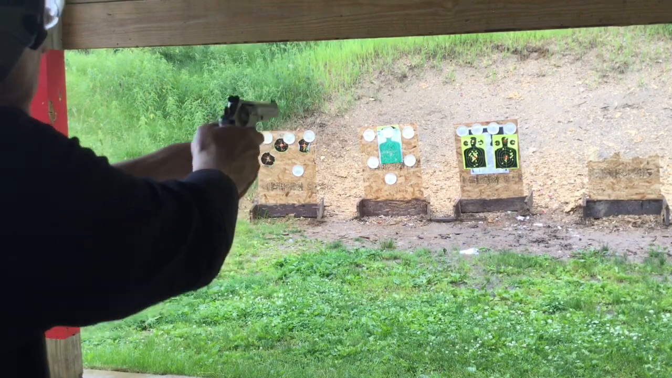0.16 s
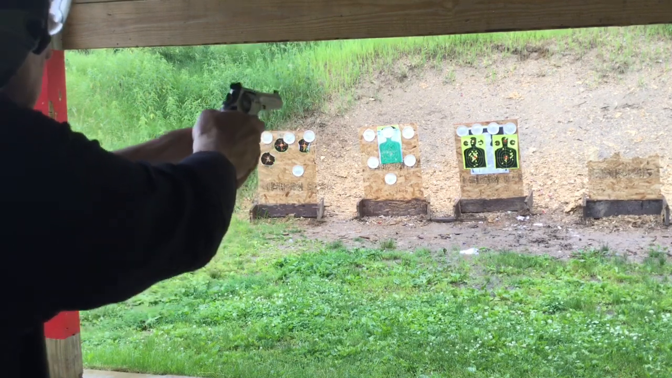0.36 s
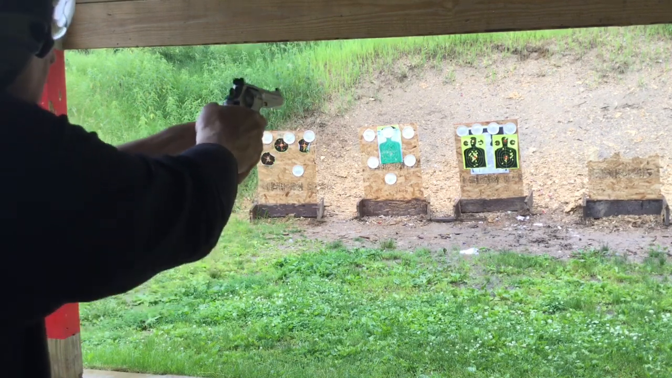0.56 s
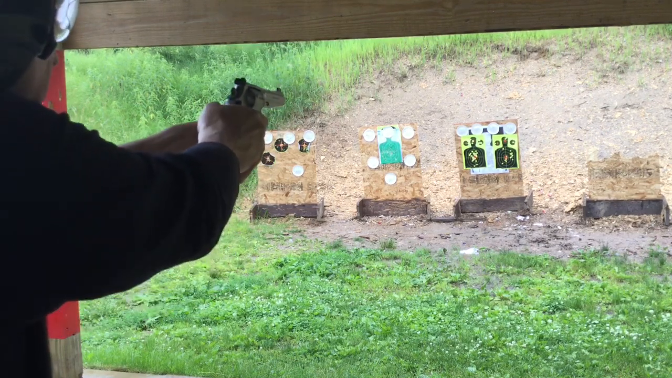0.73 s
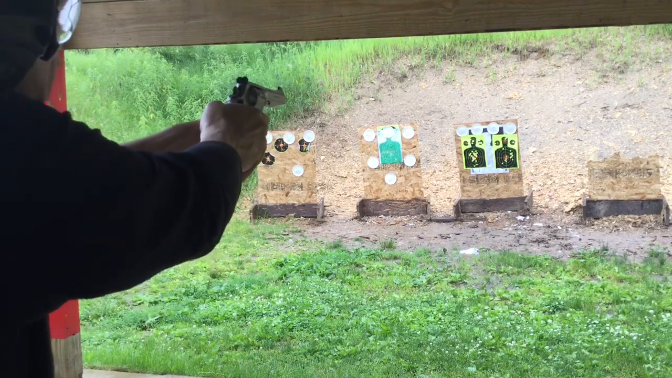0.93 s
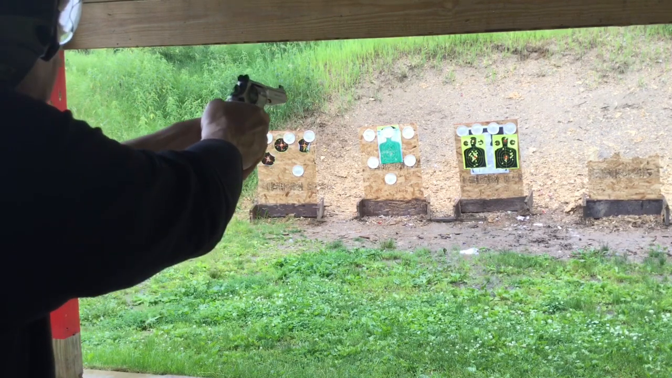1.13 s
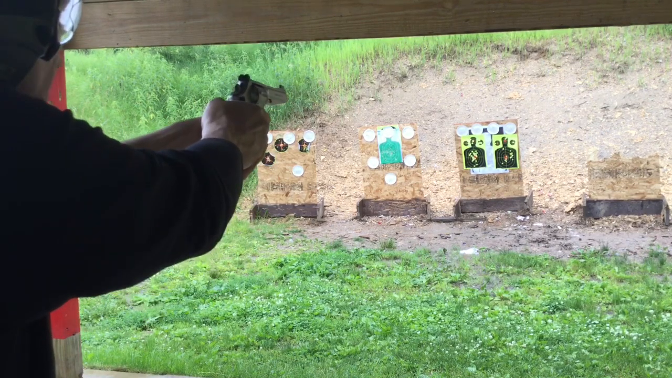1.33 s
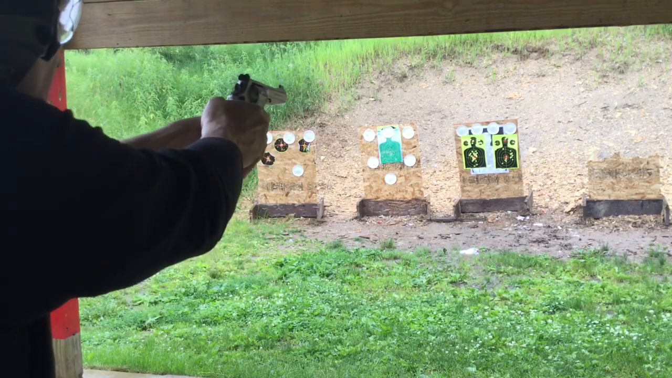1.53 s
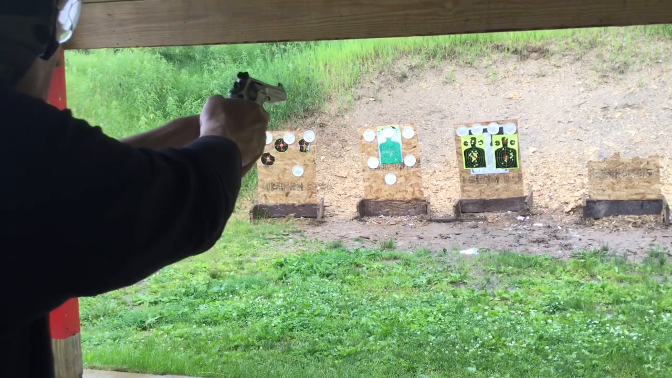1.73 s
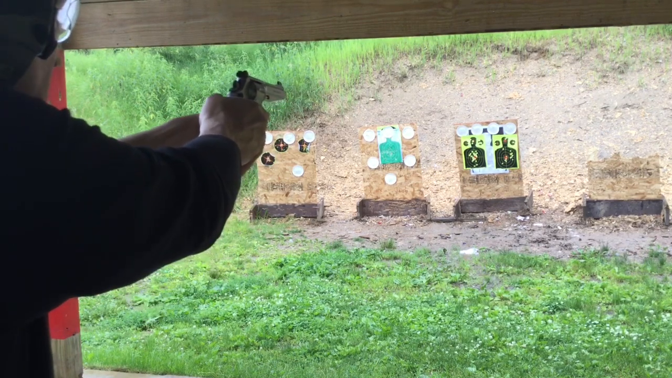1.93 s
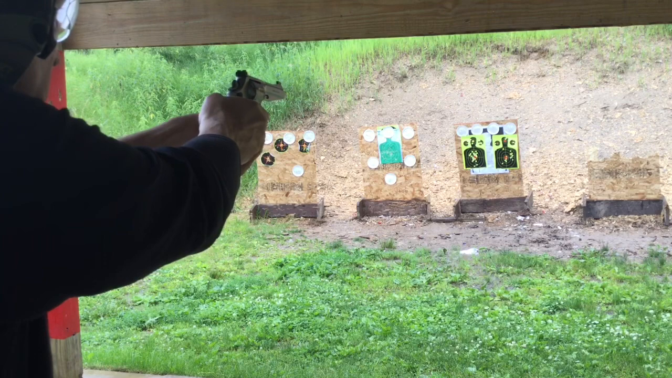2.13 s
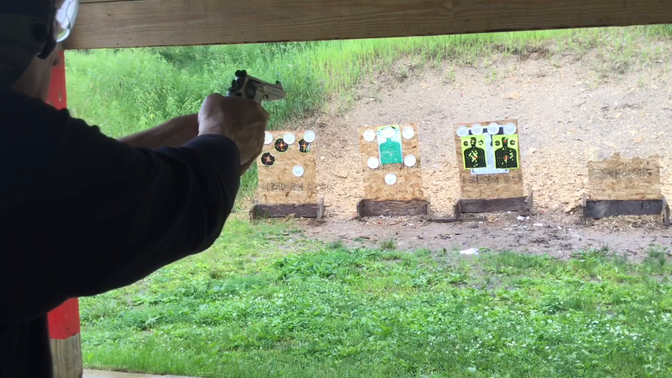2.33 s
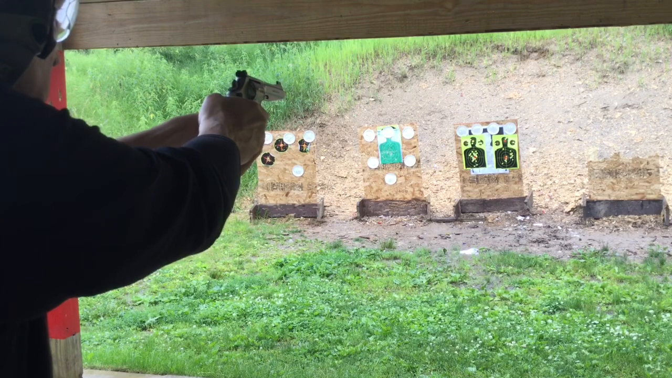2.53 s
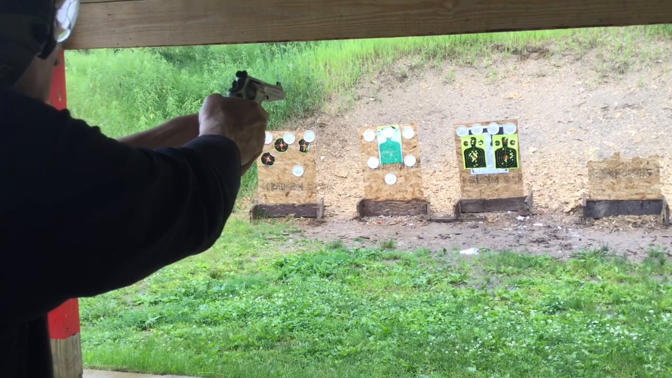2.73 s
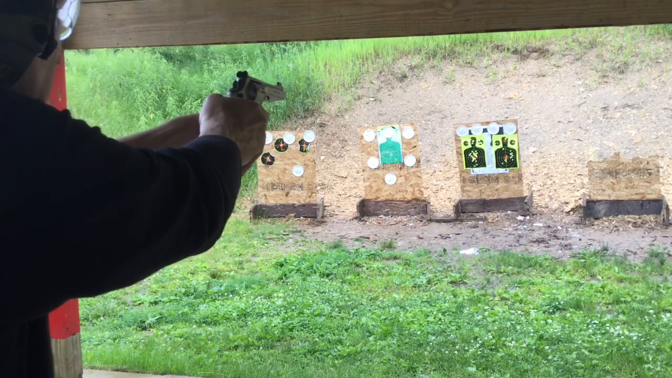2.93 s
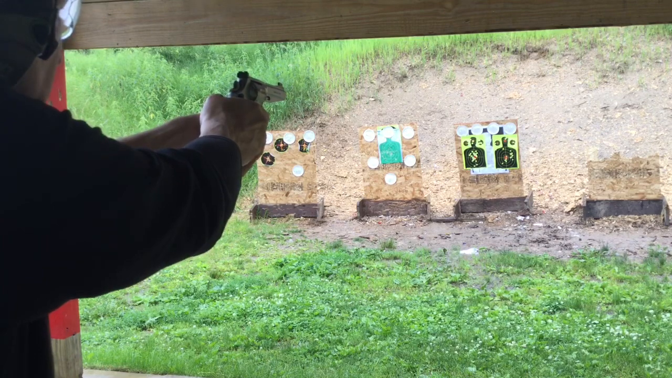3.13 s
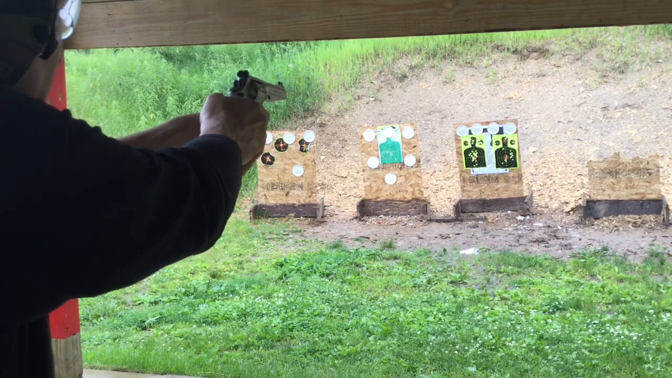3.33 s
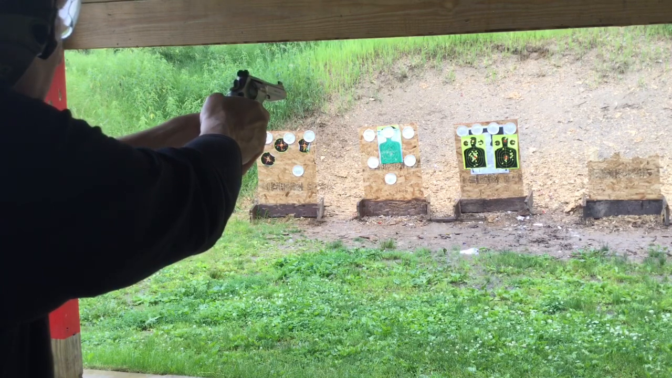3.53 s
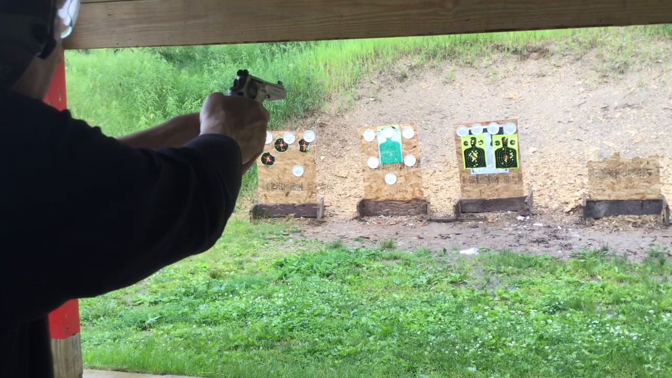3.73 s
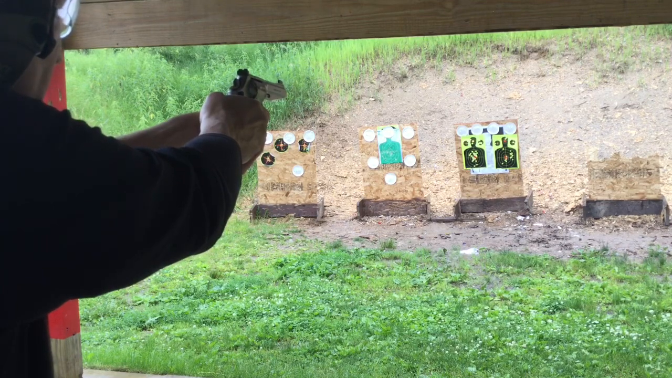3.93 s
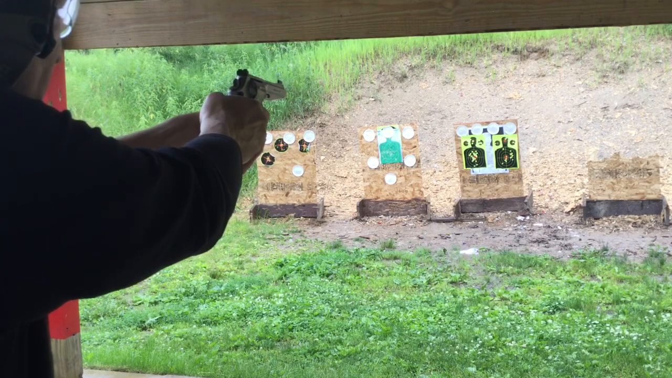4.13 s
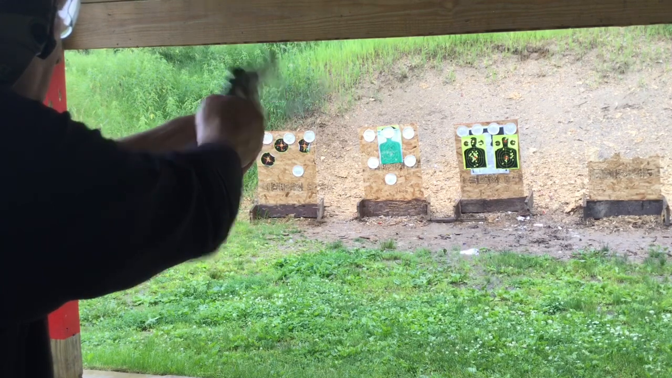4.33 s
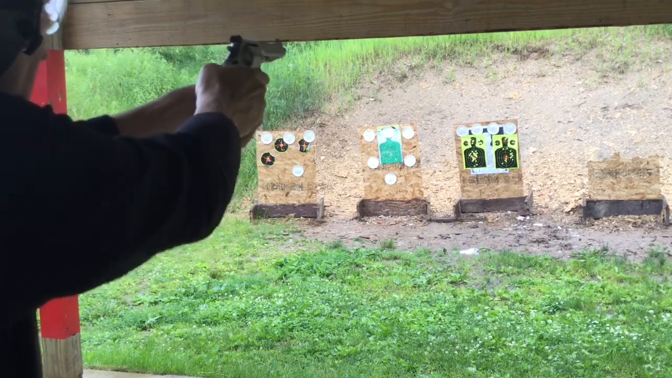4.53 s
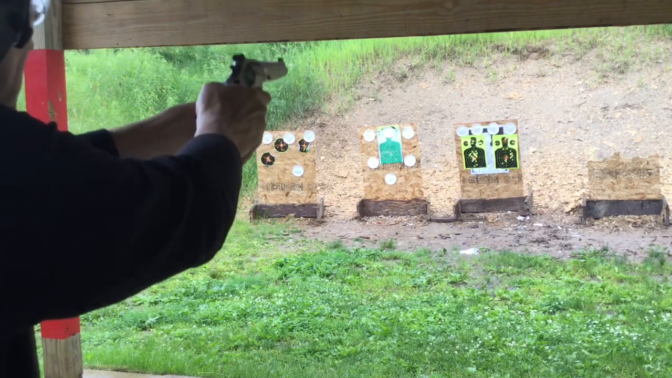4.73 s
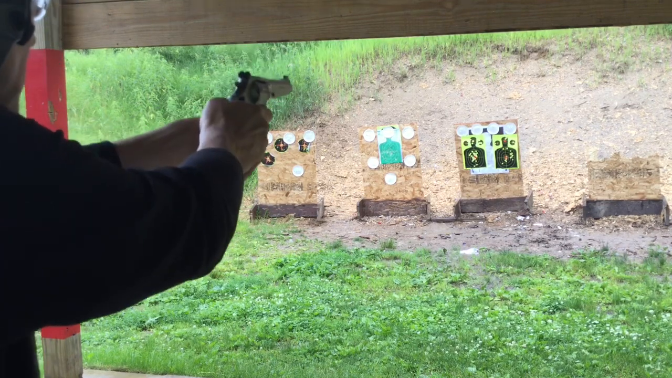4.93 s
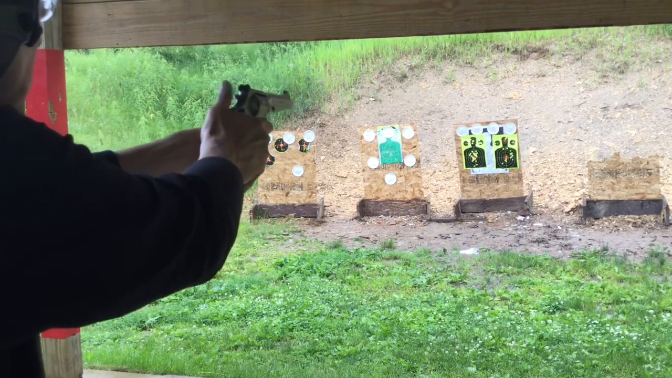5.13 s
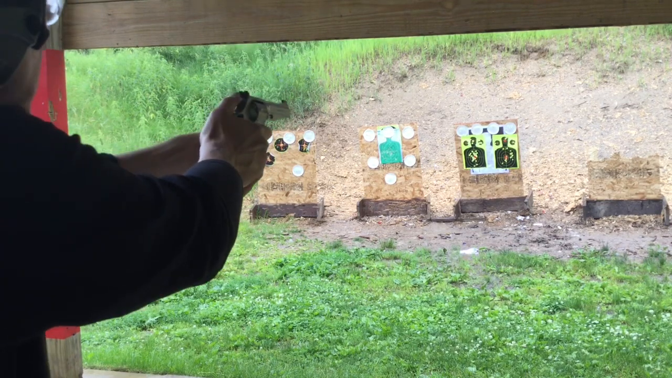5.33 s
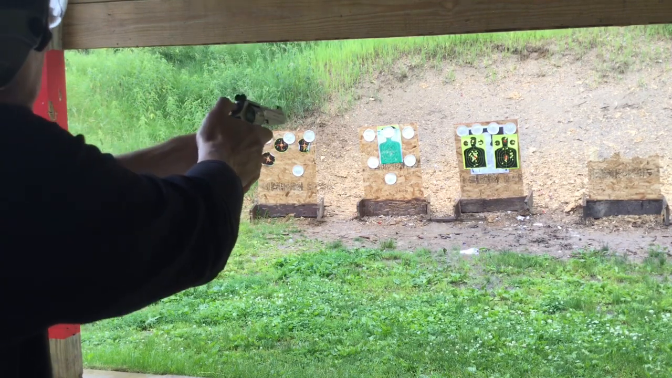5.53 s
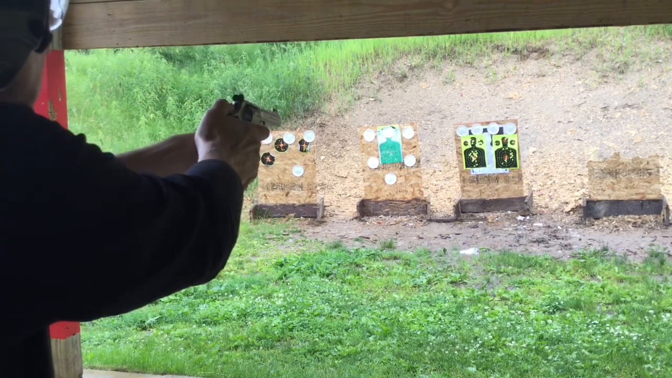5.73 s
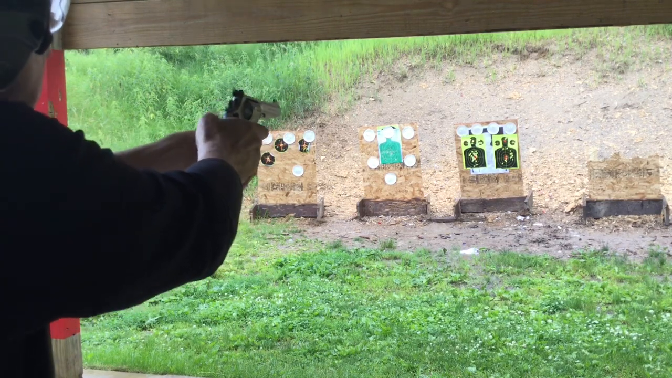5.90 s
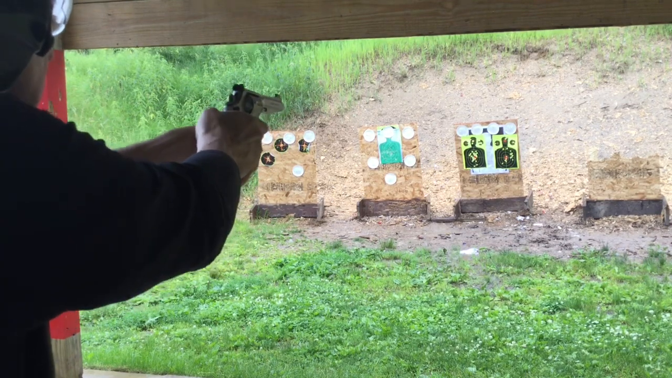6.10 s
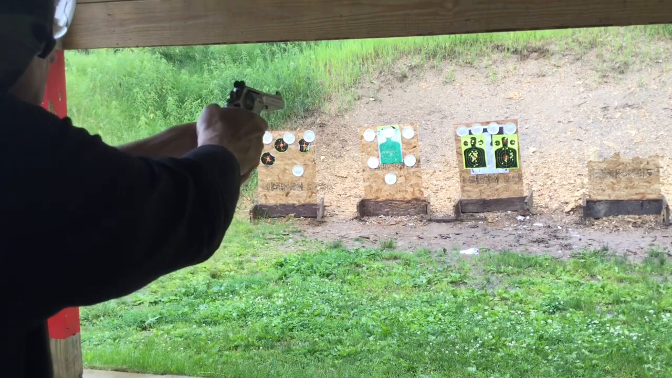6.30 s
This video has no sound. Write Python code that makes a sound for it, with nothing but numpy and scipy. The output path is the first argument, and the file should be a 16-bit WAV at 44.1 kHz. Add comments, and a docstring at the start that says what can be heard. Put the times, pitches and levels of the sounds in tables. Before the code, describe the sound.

Faint metallic clicks and a distant bird over a soft outdoor hush, then one overloaded revolver blast booms and rolls away before more gun clicks.

```python
"""Under the wooden roof of an outdoor range, one revolver shot overloads the microphone.
The blast is noise that dies band by band; the roof booms in a few tones, the earth bank slaps back,
and noise that grows ever duller makes the report roll away over the hills. A thin high ring follows.
The gun's action clicks before and after as short snaps of ringing steel; a small bird sings far off
in gliding tones, over a soft outdoor hush of coloured noise with a faint rustle and crackle."""
import sys
import numpy as np
from scipy import signal
from scipy.fft import rfft, irfft, next_fast_len
from scipy.io import wavfile
from scipy.ndimage import map_coordinates

SR = 44100
rng = np.random.default_rng(int(sys.argv[2]) if len(sys.argv) > 2 else 0)


def log_audio(samples):
    """Write samples as a 16-bit WAV file to the path given in sys.argv[1]."""
    # one column per channel
    frames = np.atleast_2d(samples).T
    # limit to full scale, then quantise
    limited = np.clip(frames, -1, 1)
    pcm = np.round(limited * 32767).astype(np.int16)
    wavfile.write(sys.argv[1], SR, pcm)


N = 280476  # length of the scene in samples

SHOT_S = 4.1765  # moment of the muzzle blast (s)

# how long sound lingers under the shelter: f/Hz, time to fall by 60 dB/s
SHELTER = [(300, .25), (4000, 0.23), (14000, 0.092)]


def amp(db):
    """Turn decibels into a plain gain."""
    return 10 ** (np.asarray(db) / 20)


def unit(x):
    """Scale a sound to an average (rms) strength of 1."""
    return x / np.sqrt(np.mean(x ** 2) + 1e-20)


def clock():
    """The time of every sample in seconds."""
    return np.arange(N) / SR


def along(points, hz):
    """Read a curve of (Hz, value) points, with straight lines between them on a log frequency axis."""
    f, v = np.transpose(points)
    return np.interp(np.log(hz + 1), np.log(f + 1), v)


def filtered(x, response):
    """Multiply the spectrum of a sound by a gain that depends on frequency."""
    size = next_fast_len(N + SR // 2)  # spare room so that the end does not wrap to the start
    gain = response(np.fft.rfftfreq(size, 1 / SR))
    return irfft(rfft(x, size) * gain, size)[:N]


def noise(spectrum):
    """Noise of rms 1 whose tone colour follows (Hz, dB) points."""
    return unit(filtered(rng.standard_normal(N), lambda hz: amp(along(spectrum, hz))))


def resonant(modes):
    """Noise of rms 1 gathered around resonances, given as (Hz, width Hz, dB)."""
    def peaks(hz):
        gain = 0
        for center, width, db in modes:
            damping = (hz * width) ** 2
            gain = gain + amp(db) * damping / ((center * center - hz * hz) ** 2 + damping)
        return gain
    return unit(filtered(rng.standard_normal(N), peaks))


def wobble(rate):
    """A smooth random curve through `rate` random points a second."""
    knots = rng.standard_normal(int(N * rate / SR) + 4)
    fine = np.arange(8 * (len(knots) - 1)) / 8  # eight curve points per knot
    curve = map_coordinates(knots, [fine])
    return np.interp(clock() * rate, fine, curve)


def fading(x, start, loss):
    """From the start time on, each frequency loses its own number of dB a second."""
    hz, t, z = signal.stft(x, SR, nperseg=256)
    loss_db_per_s = np.maximum(loss(hz), -10)[:, None]
    gain = amp(-np.maximum(t - start, 0) * loss_db_per_s)
    return signal.istft(z * gain, SR, nperseg=256)[1][:len(x)]


def burst(start, rise, spectrum, t60s):
    """A burst of noise that rises at once in all bands, then dies at its own speed in each."""
    onset = np.clip((clock() - start) / rise, 0, 1)
    return onset * fading(noise(spectrum), start, lambda hz: 60 / along(t60s, hz))


def echo(x, t60s, delay):
    """Many blurred reflections: a noise tail that builds up over the delay (s) and dies band by band."""
    tail = fading(rng.standard_normal(SR // 2), 0, lambda hz: 60 / along(t60s, hz))
    tail *= np.minimum(np.arange(len(tail)) / SR / delay, 1)
    return signal.fftconvolve(x, tail / np.linalg.norm(tail))[:N]


def swell_and_fade(crest_s, rise_db_per_s, fall_db_per_s, hold_s=0):
    """A level curve in dB that rises to 0 at the crest, holds and falls."""
    age = clock() - crest_s
    return rise_db_per_s * np.minimum(age, 0) - fall_db_per_s * np.maximum(age - hold_s, 0)


def shot():
    """A short dull swell leads into the noise burst of the blast, followed by low pushes of air."""
    # tone colour of the blast: f/Hz, relative level/dB
    blast_tone = [(30, -22.5), (70, -11), (160, -8), (400, -2), (900, 1.5), (1500, 0), (2600, -5),
                  (5000, -10), (9000, -15.5), (16000, -17.5)]
    # how long the blast lasts: f/Hz, time to fall by 60 dB/s
    blast_t60 = [(100, 0.71), (500, 0.68), (1500, 0.42), (4000, 0.4), (12000, 0.33)]
    # low pushes of air: t/s, level/dB, length/s
    thumps = [(4.238, -23, .02), (4.307, -20.5, 0.0098), (4.381, -16.5, 0.012), (6.183, -55, 0.0068)]
    swell_tone = [(60, -9.5), (400, -5.0), (1100, -1.0), (2500, -9.5), (7000, -17.5), (9500, -40.5)]
    push_tone = [(20, -11), (55, -4.5), (110, -3.5), (200, -4), (500, -51.5), (1500, -100)]
    t = clock()

    swell_db = -16 + swell_and_fade(SHOT_S, rise_db_per_s=1250, fall_db_per_s=2000)
    swell_start = np.clip((t - 4.151) / .012, 0, 1)
    swell = swell_start * amp(swell_db) * noise(swell_tone)

    blast = amp(1.0) * burst(SHOT_S, .003, blast_tone, blast_t60)

    pushes = np.zeros(N)
    for s, db, length in thumps:
        pushes += amp(db) * np.exp(-.5 * ((t - s) / length) ** 2)  # bell-shaped in time
    return swell + blast + pushes * noise(push_tone)


def roof():
    """The blast builds up under the roof, whose resonant tones boom and die away unevenly."""
    # resonances of the roof and posts: f/Hz, level/dB, time to fall by 60 dB/s
    roof_modes = [(95, -27, 0.74), (214.8, -8.5, 0.4), (266.4, -14.5, 0.92), (301.4, -9, 0.13),
                  (354.5, -6, .24), (645, -23, 0.64)]
    age = np.maximum(clock() - SHOT_S, 0)
    build_s = 0.085
    build = np.clip(age / build_s, 0, 1) ** 3
    boom = np.zeros(N)
    for hz, db, t60 in roof_modes:
        fall_db = 60 * np.maximum(age - build_s, 0) / t60
        level = amp(db - fall_db + 3.7 * wobble(40))
        start_turn = rng.random()  # each tone starts at a random point of its cycle
        boom += level * np.sin(2 * np.pi * (hz * age + start_turn) + wobble(40))
    return build * boom


def range_echoes():
    """A bright slap and the broad echo of the bank, then the long roll from trees and hills."""
    # tone colour of the sharp slap: f/Hz, relative level/dB
    slap_tone = [(40, -4), (200, 1.5), (600, -8.5), (2000, -4), (5000, -9.5), (9000, -9.5), (16000, -14)]
    # how long the slap lasts: f/Hz, time to fall by 60 dB/s
    slap_t60 = [(200, 0.29), (3000, 0.53), (12000, 0.41)]
    # tone colour of the earth bank's echo: f/Hz, relative level/dB
    bank_tone = [(30, -14), (150, -7), (400, -1), (1100, -3), (2000, -7), (4000, -11), (8000, -17.5),
                 (16000, -20)]
    # how long the bank's echo lasts: f/Hz, time to fall by 60 dB/s
    bank_t60 = [(100, 0.43), (400, 0.6), (2000, 0.51), (6000, 0.43), (14000, 0.21)]
    # tone colour of the roll before it dulls: f/Hz, relative level/dB
    hill_tone = [(18, -60), (30, -32), (233, -9.5), (259, -7), (336, -2), (374, -1), (499, -6.5),
                 (721, -4.5), (913, -9), (1160, -5.5), (1960, -14.5), (3770, -14.5), (8300, -29),
                 (16000, -51)]
    # extra loss in the air: f/Hz, loss/dB per s
    dulling = [(60, 6), (250, -0.5), (900, 0), (2000, 4.5), (4000, 16.5), (8000, 41), (15000, 38)]

    slap = amp(-12) * burst(4.3132, .001, slap_tone, slap_t60)

    lumps_db = 2.17 * wobble(160)  # the uneven slope answers in lumps
    bank = amp(-6.5 + lumps_db) * burst(4.331, 0.033, bank_tone, bank_t60)

    arrival = np.clip((clock() - 4.42) / .12, 0, 1)
    roll_db = -27 + swell_and_fade(4.6, rise_db_per_s=104, fall_db_per_s=21.5)
    scatter_db = 0.91 * wobble(45) + 0.42 * wobble(170)  # single trees and slopes answer in turn
    ever_duller = fading(noise(hill_tone), 4.69, lambda hz: along(dulling, hz))
    roll = arrival * amp(roll_db + scatter_db) * ever_duller
    return slap + bank + roll


def ridge():
    """A distant ridge returns only the bass of the report: noise around one low resonance."""
    level_db = -53.5 + swell_and_fade(5.18, rise_db_per_s=170, fall_db_per_s=30, hold_s=0.045)
    return amp(level_db) * resonant([(163.94, 85, 0)])


def contacts():
    """Clear clicks of the action and faint grip ticks while aiming, as (s, dB, pitch Hz, rattle)."""
    # small steel contacts: t/s, energy/dB, pitch f/Hz, rattle/0-1
    clicks = [(0.631, -27, 9550, 0.4), (1.1592, -18.5, 11770, 0.18), (1.6535, -23, 4400, 0.7),
              (1.7663, -24, 13300, 0.24), (2.2907, -28.5, 5800, 0.5), (2.772, -32, 10000, 0.75),
              (2.9134, -24, 3970, 0.54), (3.8308, -26, 10300, 0), (4.144, -30, 5995, 0.3),
              (5.4969, -19.5, 5000, 1), (5.5286, -15, 3600, 1), (5.5994, -17, 3240, .8),
              (5.606, -26.5, 6990, 0.1), (6.29, -18, 4300, 0.34)]
    tick_count, tick_from_s, tick_to_s = 7, 0.48, 4.1
    tick_db, tick_hz, tick_rattle = -35.5, 7000, .25  # the pitch is a typical value
    chance = rng.random((tick_count, 2))
    share = (np.arange(tick_count) + chance[:, 0]) / tick_count  # one tick in each equal slot of time
    times = tick_from_s + (tick_to_s - tick_from_s) * share
    pitches = tick_hz * 2 ** (chance[:, 1] - .5)  # up to half an octave higher or lower
    ticks = [(s, tick_db, hz, tick_rattle) for s, hz in zip(times, pitches)]
    return list(clicks) + ticks


def action():
    """Each contact is a needle-thin snap with a brief rattle of steel, answered by the shelter."""
    snaps = np.zeros(N)
    age = np.arange(SR // 50) / SR
    small_parts = signal.butter(2, 1600, "high", fs=SR)  # small parts radiate little bass
    for s, db, hz, rattle in contacts():
        tap = age == 0
        force = tap + rattle * amp(-60 * age / 0.015) * rng.standard_normal(len(age))
        part = signal.iirpeak(hz, 1.2, fs=SR)
        ring = signal.lfilter(*part, signal.lfilter(*part, force))
        crack = (0.072 + 0.27 * rattle) * force  # loose parts add a stronger wide-band crack
        snap = signal.lfilter(*small_parts, ring + crack)
        snaps[round(s * SR):][:len(age)] += amp(db) * snap / np.linalg.norm(snap)
    answer = echo(snaps, SHELTER, delay=0.0087)
    answer_tone = [(4000, -5.5), (8000, -1.5), (12000, 1.0)]
    return snaps + filtered(answer, lambda hz: amp(along(answer_tone, hz)))


def thin_ring():
    """Noise squeezed into narrow high bands rings faintly three times, holding briefly before it fades."""
    # soundings of the ring: t/s, level/dB, hold/s
    ring_times = [(4.912, -46, .1), (5.125, -56, .05), (5.33, -58, .05)]
    # tones of the ring: f/Hz, width/Hz, relative level/dB
    ring_tones = [(10890, 84, -11.5), (15200, 140, -1.5), (15250, 200, -11)]
    t = clock()
    level = np.zeros(N)
    for s, db, hold in ring_times:
        onset = np.clip((t - s) / .008, 0, 1)
        fade_db = 150 * np.maximum(t - s - hold, 0)  # 150 dB per s
        level += amp(db - fade_db) * onset
    return level * resonant(ring_tones)


def bird_notes():
    """Chirps, whistles and the trill as (s, length s, pitch Hz, arch Hz, buzz depth Hz, dB)."""
    # short arched chirps, all of one shape: t/s, level/dB (2 dB is added below)
    chirp_times = [(1.218, -59), (1.521, -58.5), (1.706, -56.5)]
    # slightly arched whistles: t/s, length/s, pitch f/Hz, level/dB (2 dB is added below)
    whistle_list = [(1.473, .047, 2975, -60), (1.652, 0.042, 2990, -57.5), (1.82, .082, 8280, -65),
                    (1.945, 0.043, 4850, -57), (2.023, 0.11, 3260, -67)]
    chirp_s, chirp_hz, chirp_arch_hz = 0.0304, 5300, 396
    chirps = [(s, chirp_s, chirp_hz, chirp_arch_hz, 0, db + 2) for s, db in chirp_times]

    arch, buzz = .02, .02  # as shares of the pitch
    whistles = [(s, length, hz, arch * hz, buzz * hz, db + 2) for s, length, hz, db in whistle_list]

    # the trill: evenly spaced buzzy notes that grow louder
    trill_start_s, trill_step_s, trill_note_s = 2.229, .1335, 0.044
    first_hz, climb_hz, scatter_hz = 5040, 19.3, 25.3  # pitch, gain per note, unsteadiness
    buzz_hz, first_db, growth_db = 268, -55, 1.0  # vibrato depth, level, gain per note
    k = np.arange(6)
    pitches = first_hz + climb_hz * k + scatter_hz * rng.standard_normal(len(k))
    trill = [(trill_start_s + i * trill_step_s, trill_note_s, hz, 0, buzz_hz, first_db + i * growth_db)
             for i, hz in enumerate(pitches)]
    return chirps + whistles + trill


def bird():
    """Each note is a sine whose pitch may arch or buzz; echoes from the trees blur the song."""
    # how long sound lingers among the trees: f/Hz, time to fall by 60 dB/s
    tree_t60 = [(2000, 0.78), (9000, 0.66)]
    song = np.zeros(N)
    # a fast, uneven vibrato makes the buzz
    flutter = np.sin(2 * np.pi * 330 * clock() + 0.45 * wobble(90)) + .15 * wobble(300)
    for s, length, hz, arch_hz, buzz_hz, db in bird_notes():
        u = np.linspace(-1, 1, round(length * SR))  # from start to end of the note
        start = round(s * SR)
        note = slice(start, start + len(u))
        pitch = hz - arch_hz * u ** 2 + buzz_hz * flutter[note]
        loudness = amp(db) * np.sqrt(1 - u ** 2)
        song[note] += loudness * np.sin(2 * np.pi * np.cumsum(pitch) / SR)
    return song + amp(-4) * echo(song, tree_t60, delay=0.012)


def outdoors():
    """Layers of noise: a distant hush, one that dies away early, a faint rustle and sparse crackles."""
    # tone colour of the hush: f/Hz, relative level/dB
    hush_tone = [(15, -37.5), (25, -15.5), (59, 0.5), (117, -3), (175, -4), (223, -6.5), (301, -4.5),
                 (344, -7.5), (863, -7), (1190, -3.5), (2990, -7.5), (4740, -9), (7310, -20), (14800, -21),
                 (16000, -19.5)]
    settling_tone = [(100, -20), (400, -0.5), (700, -5), (1200, 1.5), (2200, -12.5), (5000, -40)]
    rustle_tone = [(2000, -31), (5000, -4), (9000, 5.5), (16000, -1.5)]
    crackle_tone = [(1500, -30), (4000, -4), (9000, 2), (16000, -1)]
    hush = amp(-62 + .4 * wobble(4.5)) * noise(hush_tone)
    settling = amp(-63.5 - 14 * clock()) * noise(settling_tone)
    rustle = amp(-70.5 + 2.5 * wobble(25)) * noise(rustle_tone)
    happens = rng.random(N) < 14 / SR  # about 14 grains a second
    grains = happens * amp(-44.0 + 3 * rng.standard_normal(N))
    crackle = filtered(grains, lambda hz: amp(along(crackle_tone, hz)))
    crackle_echo = amp(3.5) * echo(crackle, SHELTER, delay=.008)
    return hush + settling + rustle + crackle + crackle_echo


def scene():
    """Everything that reaches the microphone, as one channel."""
    gun = shot() + roof() + range_echoes() + ridge() + action()
    return (gun + thin_ring() + bird() + outdoors())[None]


def record(dry):
    """The overloaded microphone flattens the peaks, and a steep filter removes the highest treble."""
    ceiling, hardness = .53, 4.5
    clipped = dry[0] / (1 + np.abs(dry[0] / ceiling) ** hardness) ** (1 / hardness)
    band_limit = signal.ellip(12, .1, 80, 15850, fs=SR, output="sos")  # low-pass at 15850 Hz
    return signal.sosfilt(band_limit, clipped)[None]


dry = scene()
out = record(dry)
log_audio(out)
```